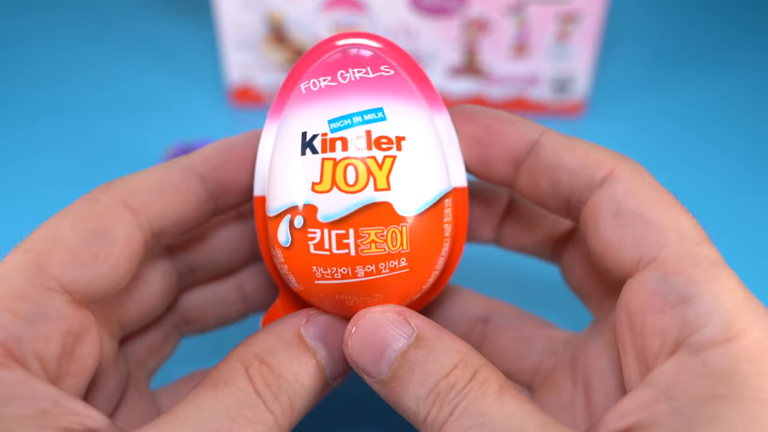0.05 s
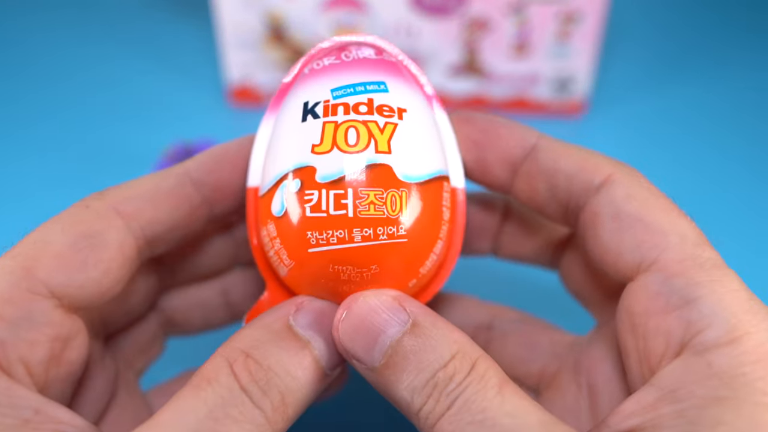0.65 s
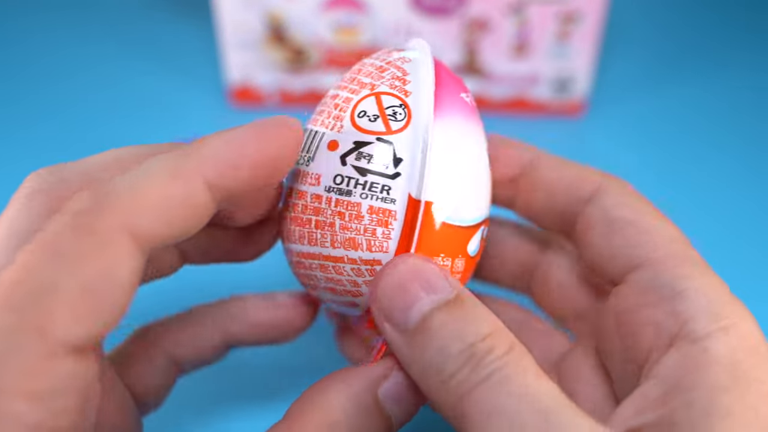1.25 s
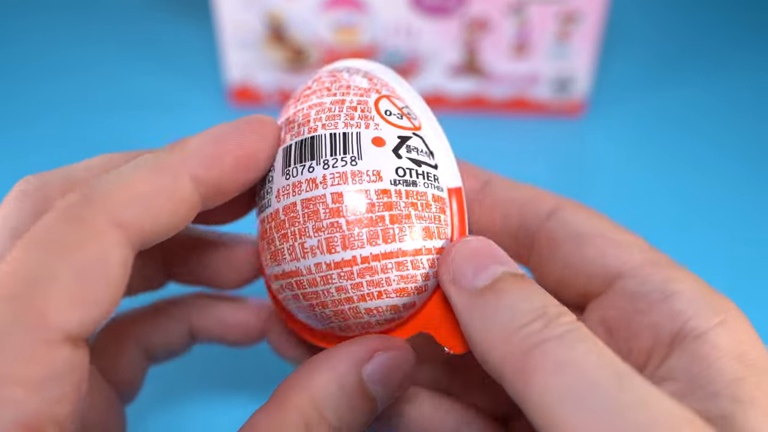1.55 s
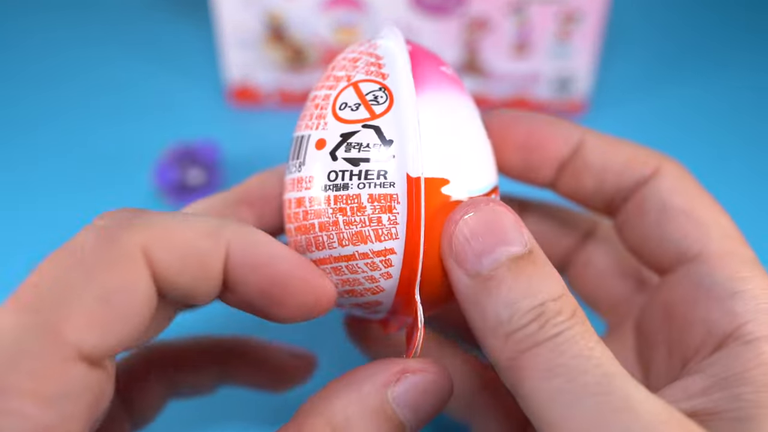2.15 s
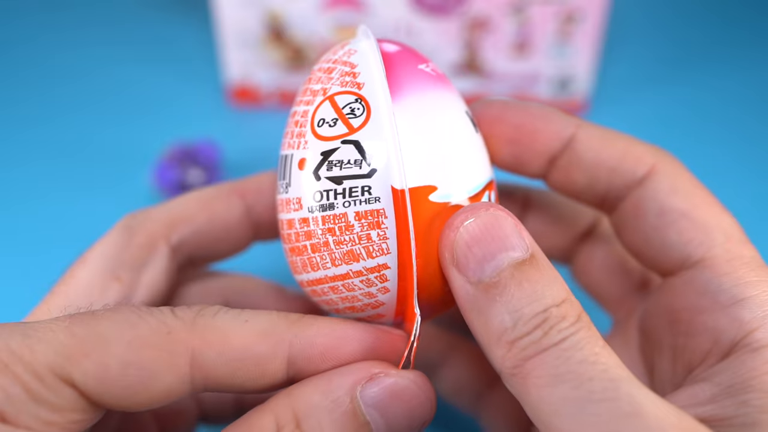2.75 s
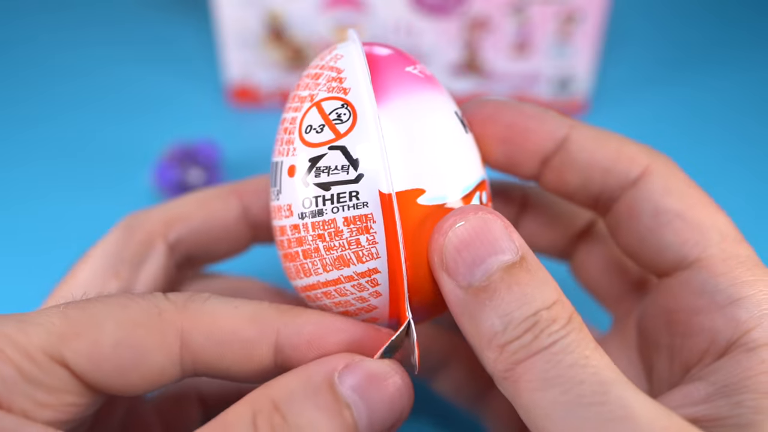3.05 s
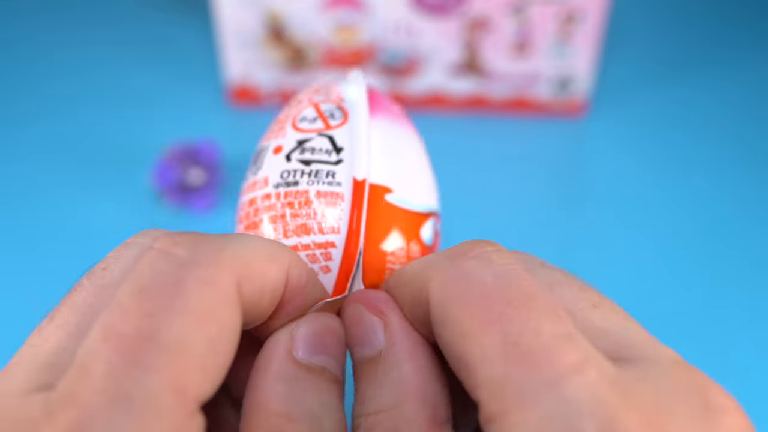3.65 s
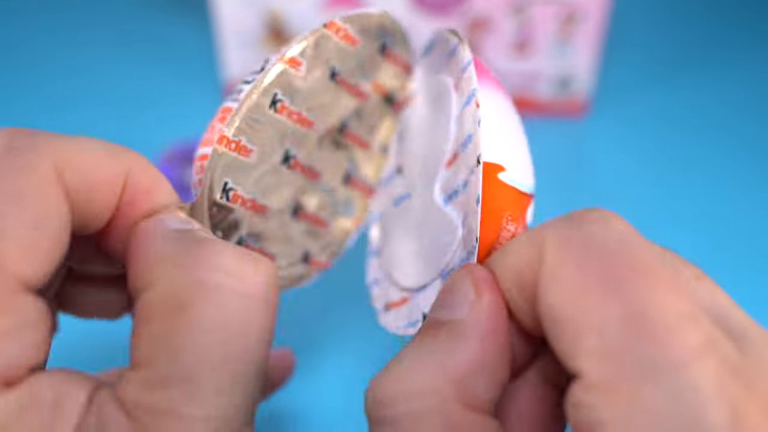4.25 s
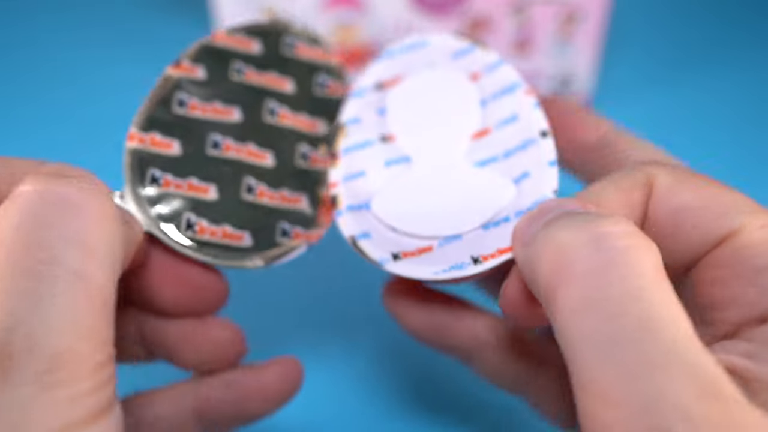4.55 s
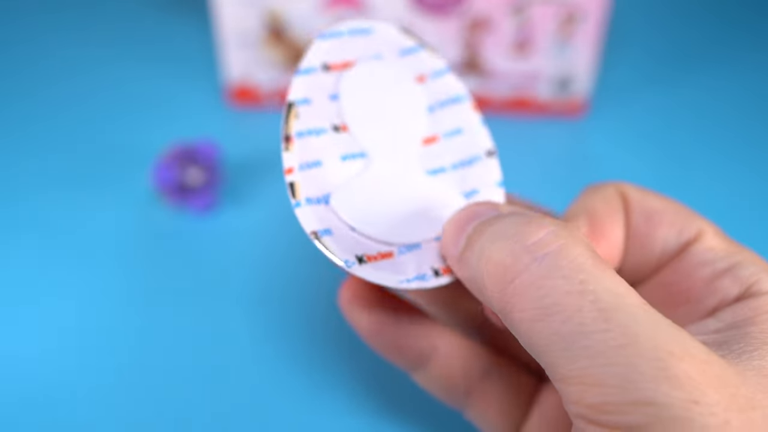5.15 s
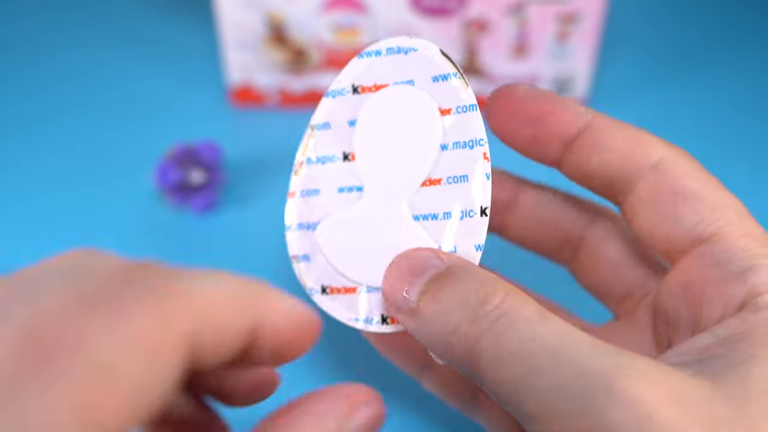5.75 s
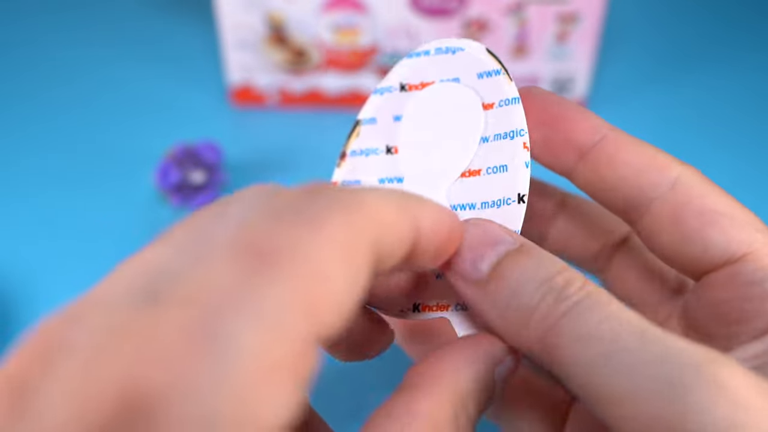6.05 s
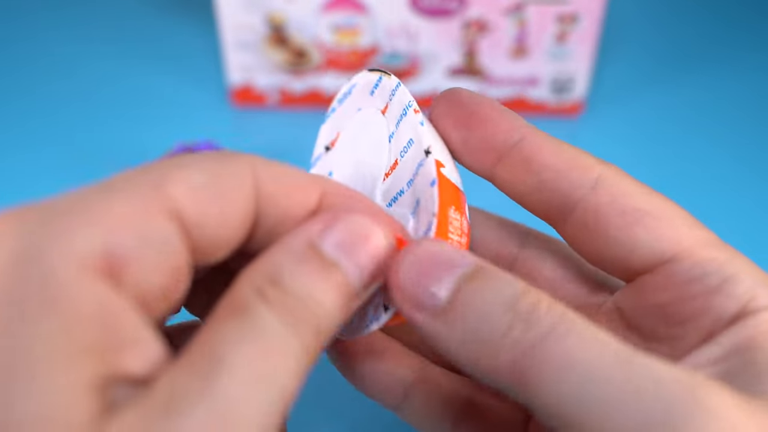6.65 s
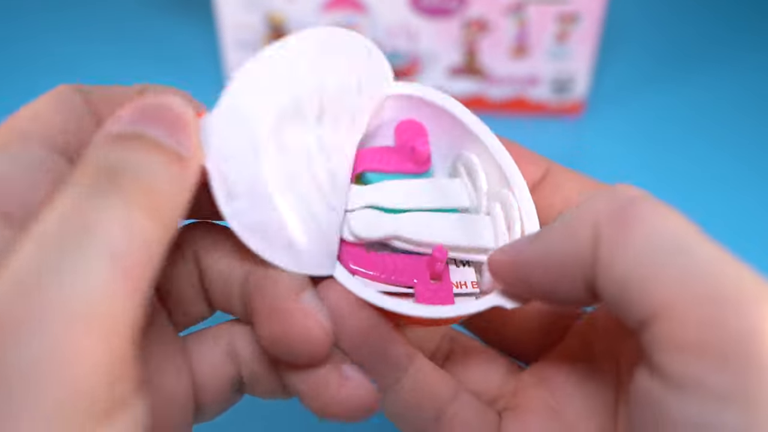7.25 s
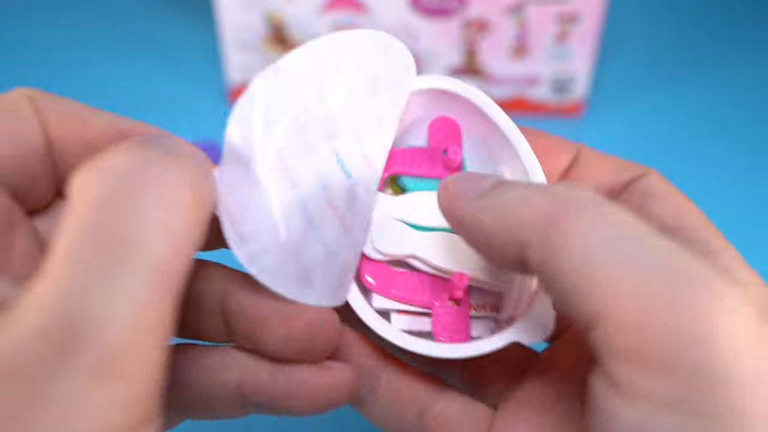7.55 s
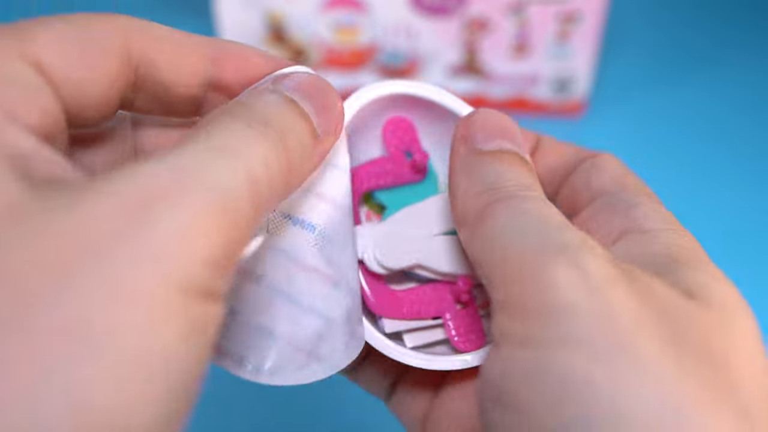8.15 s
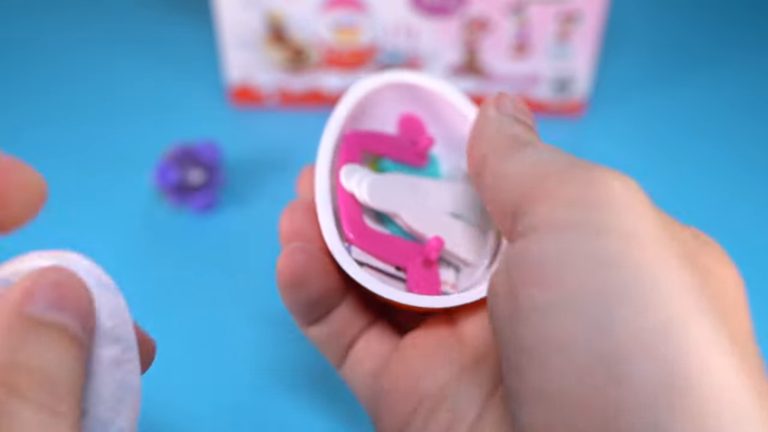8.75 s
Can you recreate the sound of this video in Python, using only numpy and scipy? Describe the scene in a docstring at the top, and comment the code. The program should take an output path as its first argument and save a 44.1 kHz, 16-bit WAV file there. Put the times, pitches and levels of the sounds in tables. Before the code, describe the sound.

Fingers softly rub a plastic candy egg, then its halves snap apart and a foil lid peels off with sharp crackles.

```python
"""Soft rubbing and small ticks, then loud snaps: hands turn a plastic candy egg close by, pull its
halves apart and peel a foil lid off one. Fingers hiss and squeak as skin sticks and slips on the shell.
The seam and the lid let go in sharp snaps, with fine crackle between them and a few dull thumps.
A bare room rings after every snap, over a low mains hum, and a limiter flattens the loudest peaks."""
import sys
import numpy as np
from scipy import signal
from scipy.fft import rfft, irfft, next_fast_len
from scipy.io import wavfile
from scipy.ndimage import uniform_filter1d, minimum_filter1d

SR = 44100
rng = np.random.default_rng(int(sys.argv[2]) if len(sys.argv) > 2 else 0)


def generate_wav(signal):
    """Clip the signal to [-1, 1] and save it as 16-bit WAV at the path in sys.argv[1]."""
    frames = np.transpose(np.atleast_2d(signal))
    scaled = np.clip(frames, -1, 1) * 32767
    pcm = np.round(scaled).astype(np.int16)
    wavfile.write(sys.argv[1], SR, pcm)


N = 387638
TIME = np.arange(N) / SR
SNAP_SAMPLES = 2048
SNAP_HZ = np.fft.rfftfreq(SNAP_SAMPLES, 1 / SR)

# The notes that the cup-shaped half rings at. Each row: pitch in Hz, width in Hz, relative level in dB.
CUP_NOTES = [(770, 68, -6), (2310, 390, 7.5), (3980, 670, -6), (5180, 76, -5), (7400, 1600, -1),
             (9250, 530, -3)]


def amp(db):
    """Turns decibels into a number to multiply by."""
    return 10 ** (np.asarray(db) / 20)


def unit_level(x):
    """Scales x to an average (rms) level of 1."""
    return x / np.sqrt(np.mean(x ** 2) + 1e-20)


def value_at(points, hz):
    """Reads between rows of (frequency in Hz, value), on a logarithmic frequency scale."""
    row_hz, value = np.transpose(points)
    return np.interp(np.log(hz + 1), np.log(row_hz + 1), value)


def add(mix, start_s, sound):
    """Adds a sound to the mix at its start time."""
    part = mix[round(start_s * SR):][:len(sound)]
    part += sound[:len(part)]


def coloured(x, tone):
    """Filters x by rows of (frequency in Hz, gain in dB), then sets its level to 1."""
    size = next_fast_len(len(x))
    gain = amp(value_at(tone, np.fft.rfftfreq(size, 1 / SR)))
    return unit_level(irfft(rfft(x, size) * gain, size)[:len(x)])


def drift(count, smooth_samples):
    """A random curve; more smoothing makes it wander more slowly."""
    return unit_level(uniform_filter1d(rng.standard_normal(count), size=smooth_samples))


def grains(per_s, spread_db):
    """Tiny clicks at random times: many small, a few large."""
    size = amp(spread_db * np.minimum(rng.exponential(1, N), 4))
    return unit_level(size * rng.choice([-1, 1], N) * (rng.random(N) < per_s / SR))


def strokes(rows, rise_s=0.011, fall_s=0.022):
    """Loudness over time of hand movements: each takes hold, stays and lets go."""
    out = np.zeros(N)
    for start_s, length_s, db in rows:
        t = np.arange(0, length_s + fall_s / 4, 1 / SR)
        add(out, start_s, amp(db) * np.minimum(t / rise_s, 1) * np.minimum(t[::-1] / fall_s, 1))
    return out


def changing_grip(x, depth_db):
    """The grip keeps changing, so small resonances of the shell come and go."""
    spectrum = signal.stft(x, nperseg=256)[2]
    patches = uniform_filter1d(rng.standard_normal(spectrum.shape), size=4, axis=0)  # smooth over pitch
    patches = unit_level(uniform_filter1d(patches, size=16, axis=1))  # and over time
    return unit_level(signal.istft(spectrum * amp(depth_db * patches), nperseg=256)[1][:N])


def background(hiss_db=-65):
    """Mains hum, faint hiss and a low rumble that swells as the hands shift."""
    # The tones of the hum. Each row: pitch in Hz, level in dB.
    hum_tones = [(50, -68.5), (100, -57), (200, -77), (300, -74)]
    # The tone of the rumble and of the hiss. Each row: frequency in Hz, gain in dB.
    rumble_tone = [(15, -15.5), (30, -11), (41, -3.5), (48, 11), (55, -9), (66, -10), (110, -17),
                   (170, -30), (400, -47.5)]
    hiss_tone = [(80, -29), (130, -0.5), (190, -1), (300, -3), (400, -9.5), (650, -11), (1000, -20),
                 (2000, -23), (4000, -20.5), (6000, -27.5), (10500, -21.5), (16000, -39)]
    # How loud the rumble is. Each row: time in seconds, level in dB.
    rumble_levels = [(0, -55.5), (1.15, -55), (1.3, -48.5), (1.95, -56), (2.6, -53.5), (3.2, -53.5),
                     (4.8, -59), (5.7, -59), (6.2, -54), (8.79, -55.5)]
    hum = sum(amp(db) * np.sqrt(2) * np.sin(2 * np.pi * (hz * TIME + rng.random()))
              for hz, db in hum_tones)
    swell = amp(np.interp(TIME, *np.transpose(rumble_levels)))
    rumble = swell * coloured(rng.standard_normal(N), rumble_tone)
    return hum + rumble + amp(hiss_db) * coloured(rng.standard_normal(N), hiss_tone)


def finger_rubs(gain_db=-1, catch_db=4.0, pressure_db=1.45):
    """Skin catches and slides over the shell or foil, making a grainy hiss and a hollow rub."""
    # Finger strokes. Each row: start and length in seconds, relative hiss and hollow levels in dB.
    rubs = [(0, 0.031, -54.5, -65), (0.786, 0.056, -52.5, -71), (0.919, .18, -55, -64),
            (1.184, 0.072, -53.5, -84), (1.265, .13, -52.5, -69.5), (1.416, 0.082, -53, -62.5),
            (1.519, 0.12, -56, -66), (1.634, 0.096, -61, -55), (1.832, 0.021, -41, -82),
            (1.907, 0.044, -47, -62), (1.997, .17, -52.5, -91), (2.323, 0.029, -50.5, -60),
            (3.185, 0.1, -49.5, -62.5), (3.342, 0.11, -54.5, -68), (5.456, 0.15, -75, -58),
            (5.737, 0.059, -58.5, -66), (6.126, 0.34, -70.5, -74.5), (6.459, 0.037, -49.5, -57.5),
            (6.591, 0.089, -59, -57.5), (6.721, 0.029, -42.5, -54.5), (7.583, 0.019, -37.5, -38.5),
            (7.619, 0.025, -36.5, -36.5), (7.731, 0.044, -38, -42), (7.846, 0.15, -50, -69),
            (8.043, 0.022, -41, -60)]
    # The tone of the hiss and of the hollow rub. Each row: frequency in Hz, gain in dB.
    hiss_tone = [(700, -19), (1700, -11), (2300, -1), (3200, -5), (4800, -5), (7000, -0.5), (8600, -2.5),
                 (11000, 2), (13400, -12), (16000, -26)]
    hollow_tone = [(150, -24), (350, -14), (650, -6), (1000, -7), (1600, -7), (2600, -21)]
    hiss_level = strokes((start_s, length_s, db) for start_s, length_s, db, _ in rubs)
    hollow_level = strokes((start_s, length_s, db) for start_s, length_s, _, db in rubs)
    catches = catch_db * drift(N, smooth_samples=260)
    pressure = pressure_db * drift(N, smooth_samples=2000)
    slips = grains(per_s=3900, spread_db=3.5) * amp(catches + pressure)
    hiss = hiss_level * changing_grip(coloured(slips, hiss_tone), depth_db=4.5)
    hollow = hollow_level * coloured(slips, hollow_tone)
    return amp(gain_db) * (hiss + hollow)


def resonance(hz, width_hz):
    """A hump of height 1 around one pitch; the sign of the width makes no difference."""
    return 1 / (1 + (2 * (SNAP_HZ - hz) / width_hz) ** 2)


def ringing_filter(db):
    """A filter with these gains that rings only after it is struck, never before."""
    log_gain = np.log(amp(np.r_[db, db[-2:0:-1]]))
    return np.exp(np.conj(signal.hilbert(log_gain)))[:len(db)]


def snap(start_s, length_s, ring_hz, kind, evenness, lid_opens_s=7.0):
    """A quick run of tiny fractures rings a patch of thin plastic for a few milliseconds."""
    # How the packaging sounds as it gives: tick, crack, rip, break, buckle, pop or knock. Each row:
    # thump, body, brightness and ring height in dB, then ring width as a share of its pitch.
    kinds = {"tick": (0.75, 5, 3, 8, .24), "crack": (-2.5, -4, 14.5, 8.5, 0.3),
             "rip": (-12, 1.5, 6, 8, 1.15), "break": (-5.5, 5.5, 7.5, 6.5, 0.4),
             "buckle": (-17.5, -4, -9.5, 6, -1.6), "pop": (-15.5, -5.5, -7.5, 12.5, 0.5),
             "knock": (1.5, 15, 6.5, 12.5, -2.7)}
    # Where the thump, the body, the 0 dB point and the brightness lie, in Hz.
    bands_hz = (300, 1300, 3900, 9500)
    thump_db, body_db, bright_db, ring_db, ring_share = kinds[kind]
    t = np.arange(SNAP_SAMPLES) / SR
    fade = np.exp(-(t / (1.6 * max(length_s, 1e-4))) ** 2) + amp(-19) * np.exp(-t / .003)
    burst = rfft(fade * rng.standard_normal(len(t)))
    # The burst has chance peaks and dips in its tone; an evenness of 1 levels them out.
    uneven_db = 10 * np.log10(uniform_filter1d(abs(burst) ** 2, size=21))
    tone = [(90, thump_db - 7), *zip(bands_hz, (thump_db, body_db, 0, bright_db)),
            (11500, bright_db - 2), (15500, bright_db - 13), (18000, bright_db - 40.5)]
    tone_db = value_at(tone, SNAP_HZ) + ring_db * resonance(ring_hz, ring_share * ring_hz + 200)
    if start_s > lid_opens_s:  # the open cup rings along
        cup = sum(amp(db - 6) * resonance(hz, width_hz) for hz, width_hz, db in CUP_NOTES)
        tone_db += 20 * np.log10(1 + cup)
    sound = irfft(burst * ringing_filter(tone_db - evenness * uneven_db))
    return sound / np.sqrt(np.sum(sound ** 2) / (SR / 1000))  # as much energy as 1 ms at level 1


def packaging_snaps(peel_start_s=7.0863, peel_step_s=0.014):
    """Shell and lid snap sharply, heard close by and sent out into the room."""
    # The halves part from 3.5 s and the lid peels from 6.8 s. Each row: start in seconds, relative
    # level in dB, length in seconds, ring pitch in Hz, gain into the room in dB, kind of snap.
    snaps = [(0.174, -47, 0.011, 10700, -12, "tick"), (1.2807, -41.5, .001, 2970, 4, "buckle"),
             (1.458, -33.5, 0.0011, 11800, -25, "crack"), (1.7218, -35, 0.00051, 6540, -13, "tick"),
             (1.733, -31.5, 0.0015, 6630, -18, "tick"), (2.079, -37, 0.0028, 9700, 4, "crack"),
             (2.1068, -41.5, .0012, 2180, -25, "buckle"), (2.2267, -39, 0.0005, 654, -15, "knock"),
             (2.3305, -41, 0.0036, 4170, -8, "buckle"), (2.82, -44, 0.0062, 7500, -10, "tick"),
             (2.921, -47.5, 0.0034, 9800, -10, "tick"), (3.535, -19.5, 0.0012, 11300, -1, "crack"),
             (3.5414, -17, 0.0012, 13400, -17, "crack"), (3.5528, -21.5, 0.0015, 2200, -11, "rip"),
             (3.6157, -6, .0007, 7500, -5.5, "crack"), (3.652, -9.5, 0.00041, 8900, -4, "crack"),
             (3.8172, -12, 0.00025, 7800, -4, "crack"), (3.8576, -15, 0.0001, 9500, -8, "crack"),
             (3.8841, -6, 0.0015, 4500, -2.5, "break"), (3.9116, -11, 0.00064, 10200, -8, "crack"),
             (3.92, -19, 0.00086, 786, -7.5, "knock"), (3.997, -14.5, 0.0011, 9400, -13, "break"),
             (4.0147, -14, 0.0026, 7240, -6.5, "tick"), (4.0787, -10, 0.0018, 1840, -10, "pop"),
             (4.166, -4, 0.0014, 10000, -1.5, "rip"), (4.219, -13, 0.0006, 7320, -10, "crack"),
             (4.2362, -14, .0009, 7420, -5, "crack"), (4.27, -4.5, 0.0012, 7640, -3.5, "break"),
             (4.2721, -5, 0.0036, 9500, -21, "rip"), (4.2968, -9.5, 0.00044, 4310, 3, "buckle"),
             (4.3032, -14.5, 0.0057, 9250, 7, "rip"), (4.3237, -16, 0.00057, 9900, 3, "buckle"),
             (4.345, -17.5, .002, 1350, -3.5, "rip"), (4.488, -22, 0.0037, 10400, -7, "crack"),
             (4.519, -5.5, 0.0047, 10600, -5.5, "rip"), (4.529, -1, 0.00034, 11600, -4, "pop"),
             (4.861, -36, .001, 1707, -2, "buckle"), (4.9593, -40, 0.0019, 1620, -2, "tick"),
             (5.2555, -24.5, .0005, 2434, -6.5, "rip"), (5.4361, -37.5, 0.012, 2480, -5.5, "tick"),
             (5.552, -27.5, 0.0023, 6700, -9, "tick"), (5.554, -32, 0.0025, 1660, -7.5, "pop"),
             (6.0833, -38.5, 0.0019, 7500, -4.5, "tick"), (6.6246, -34.5, 0.0022, 2450, -4, "tick"),
             (6.7771, -22, 0.0027, 11900, -7, "tick"), (6.884, -5, 0.0026, 5400, 1.5, "break"),
             (6.924, -13.5, 0.01, 1230, -8, "knock"), (7.041, -17, 0.0078, 1230, -1.5, "knock"),
             (7.049, -18, 0.00088, 1230, -14, "knock"), (7.068, -5.5, 0.0023, 980, -5.5, "tick"),
             (7.306, -16.5, 0.0039, 700, -7.5, "knock"), (7.32, -3.5, 0.0015, 5650, -8.5, "rip"),
             (7.5627, -23, 0.0036, 2410, -6.5, "buckle"), (7.705, -22, .0017, 2270, -3.5, "pop"),
             (7.801, -25, 0.0028, 4530, -7.5, "buckle"), (8.02, -31.5, 0.001, 9900, -3, "tick"),
             (8.0878, -14, 0.00051, 3730, -9, "rip"), (8.094, -24, 0.0044, 1320, -9, "knock"),
             (8.1444, -15.5, 0.0013, 3320, -14.5, "pop"), (8.156, -29.5, 0.00096, 1310, -6, "knock"),
             (8.2529, -14.5, 0.0014, 1830, -4, "buckle"), (8.3035, -10, 0.00068, 8700, -9, "rip"),
             (8.4282, -20, .001, 11700, -4.5, "crack"), (8.449, -18, 0.0015, 4600, -9.5, "buckle"),
             (8.5261, -18, 0.0016, 7360, 1.5, "rip"), (8.5334, -12.5, 0.00075, 2210, -7.5, "pop"),
             (8.537, -10.5, 0.0015, 6960, -8, "rip"), (8.639, -10.5, 0.00072, 10300, -10, "rip"),
             (8.6484, -10.5, 0.0049, 2230, -15, "tick")]
    # The lid unzips round the rim in four even jerks, each one knocking the cup.
    peel = [(peel_start_s + k * peel_step_s, -13, 0.0018, 830, -14, "knock") for k in range(4)]
    near, outward = np.zeros((2, N))
    for start_s, db, length_s, ring_hz, room_db, kind in snaps + peel:
        add(near, start_s, amp(db) * snap(start_s, length_s, ring_hz, kind, evenness=0.89))
        add(outward, start_s, amp(db + room_db) * snap(start_s, length_s, ring_hz, kind, evenness=1))
    return near, outward


def skin_squeaks(jitter=0.072, settle_s=0.0047, highest_hz=13500):
    """Skin sticks and slips on the tab, slowly and unevenly at first, then settles into a chirp."""
    # The squeaks. Each row: start and length in seconds, final pitch in Hz, share of that pitch
    # it climbs (0 to 1), level in dB, roughness (0 to 1).
    squeaks = [(3.476, 0.015, 1924, 0.08, -42.5, 0.4), (3.512, .03, 2202, 0.72, -31, 0.5),
               (4.045, 0.0033, 7300, 0.04, -22.5, 0.2), (4.117, 0.0034, 7240, 0.02, -24, .2),
               (4.144, 0.0042, 7350, 0, -19.5, .15)]
    # The tone of every squeak. Each row: frequency in Hz, gain in dB.
    tone = [(300, -22.5), (1300, -14), (2300, -1.5), (4500, -8.5), (7000, -10.5), (11500, -10),
            (15000, -19.5)]
    out = np.zeros(N)
    for start_s, length_s, final_hz, climb, db, roughness in squeaks:
        t = np.arange(0, length_s, 1 / SR)
        unsettled = climb * np.exp(-(t / settle_s) ** 2)
        hz = final_hz * (1 - unsettled)
        rough = roughness + unsettled
        cycles = np.cumsum(hz * (1 + jitter * rough * drift(len(t), smooth_samples=20))) / SR
        slips = sum(np.cos(2 * np.pi * k * cycles) * (k * hz < highest_hz) for k in range(1, 14))
        scrape = .7 * rough * rng.standard_normal(len(t))
        chirp = coloured(unit_level(slips) + scrape, tone)
        add(out, start_s, amp(db) * chirp * signal.windows.tukey(len(t), .3))
    return out


def seal_crackle(fade_s=0.0011):
    """The seal parts thread by thread, each a very short burst of noise."""
    # Pulls on the seal or the foil. Each row: start in seconds, length in seconds, level in dB.
    pulls = [(3.55, 0.23, -56), (3.85, .24, -40.5), (4.1, 0.33, -33.5), (6.9, 0.044, -24.5),
             (7.08, 0.077, -20.5), (8.16, 0.041, -38), (8.305, .055, -33), (8.42, 0.056, -37.5),
             (8.52, 0.0735, -35.5), (8.645, 0.051, -29), (8.765, .04, -42)]
    # The tone of the foil. Each row: frequency in Hz, gain in dB.
    foil_tone = [(200, -26), (700, -6), (2200, 3), (4500, 1.5), (7500, 0), (11000, 0), (16000, -23.5)]
    t = np.arange(256) / SR
    threads = grains(per_s=260, spread_db=4.6)
    bursts = signal.oaconvolve(abs(threads), np.exp(-t / fade_s))[:N]
    crackle = coloured(bursts * rng.standard_normal(N), foil_tone)
    return strokes(pulls) * changing_grip(crackle, depth_db=3.0)


def palm_thumps(rise_s=.0015, fade_s=.011):
    """When something gives, a half jolts against the palm, which damps it to a dull thump."""
    # The jolts. Each row: start in seconds, level in dB.
    jolts = [(4.271, -40), (4.358, -38), (4.519, -41.5), (7.068, -31), (7.322, -39), (8.65, -28.5)]
    # The tone of a thump. Each row: frequency in Hz, gain in dB.
    tone = [(60, -3), (160, 2.5), (280, 0.5), (420, -13.5), (900, -22), (2500, -45)]
    t = np.arange(4096) / SR
    level = np.zeros(N)
    for start_s, db in jolts:
        add(level, start_s, amp(db) * np.minimum(t / rise_s, 1) * np.exp(-t / fade_s))
    return level * coloured(rng.standard_normal(N), tone)


def cup_ring(lid_free_s=7.321, gain_db=-14, jerk_hz=2200):
    """As the lid jerks free, the cup rings out of its open mouth into the room."""
    t = np.arange(2048) / SR
    out = np.zeros(N)
    for hz, width_hz, db in CUP_NOTES:
        share = hz ** 2 / (hz ** 2 + jerk_hz ** 2)  # a jerk at the rim hardly stirs the lowest note
        note = np.exp(-np.pi * width_hz * t) * np.cos(2 * np.pi * hz * t)
        add(out, lid_free_s, share * amp(gain_db + db) * note)
    return out


def room_echoes(x, gap_s=0.009, build_s=0.022):
    """The first echoes come back after a short gap, thicken, and die away, the treble first."""
    # How long the room rings. Each row: frequency in Hz, seconds to fade by 60 dB.
    ring_times = [(200, 1), (600, 0.48), (1500, 0.75), (3500, .68), (7000, 0.62), (11000, .46),
                  (16000, 0.18)]
    # The tone of the room. Each row: frequency in Hz, gain in dB.
    tone = [(100, -9.5), (190, -2), (270, -1), (400, -4.5), (640, 10), (1000, -6), (1300, 2.5), (4000, 2),
            (8000, -0.5), (11000, -1.5), (15500, -2.5)]
    t = np.arange(SR) / SR
    density = np.clip(.34 + (t - gap_s) / build_s, 0, 1) * (t > gap_s)
    echoes = rng.standard_normal(SR) * (rng.random(SR) < density / 2)
    hz, age_s, spectrum = signal.stft(echoes, SR, nperseg=256)
    fade = amp(-60 * age_s / value_at(ring_times, hz)[:, None])
    fade *= amp(value_at(tone, hz))[:, None] / np.linalg.norm(fade, axis=1, keepdims=True)
    tail = signal.istft(spectrum * fade, SR, nperseg=256)[1]
    return signal.fftconvolve(x, tail / np.linalg.norm(tail))[:N]


def shifting_echoes(x, shift_hz=0.8):
    """The hands move, so the sound slowly swings between two patterns of echoes."""
    angle = 2 * np.pi * shift_hz * TIME
    return room_echoes(x * np.cos(angle)) + room_echoes(x * np.sin(angle))


def scene():
    """Snaps and handling close by, with the room behind them, in one channel."""
    snaps, outward_snaps = packaging_snaps()
    rubs, crackle, squeaks, thumps = finger_rubs(), seal_crackle(), skin_squeaks(), palm_thumps()
    close = amp(1) * snaps + rubs + crackle + squeaks + thumps
    into_room = (outward_snaps + cup_ring() + amp(-4) * rubs + amp(-6) * crackle
                 + amp(-10) * squeaks + amp(-5) * thumps)
    return (close + shifting_echoes(into_room) + background())[None]


def record(dry):
    """A fast limiter turns the loudest peaks down, then a filter cuts the highest treble."""
    ceiling, cutoff_hz = .8, 16000
    gain = minimum_filter1d(ceiling / np.maximum(abs(dry), ceiling), size=15)
    limited = dry * uniform_filter1d(gain, size=15)
    treble_cut = signal.firwin(255, cutoff_hz, window=("kaiser", 9), fs=SR)
    return signal.oaconvolve(limited, treble_cut[None], "same")


dry = scene()
out = record(dry)
generate_wav(out)
```